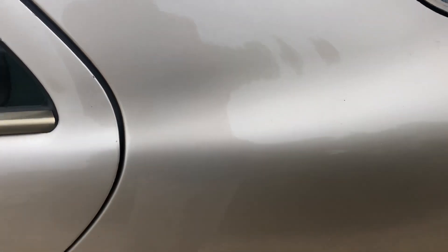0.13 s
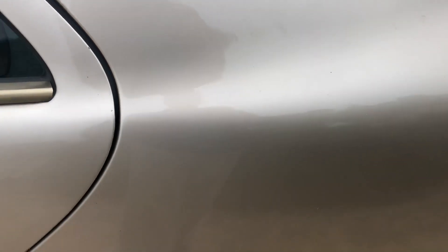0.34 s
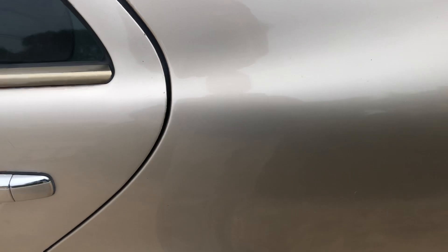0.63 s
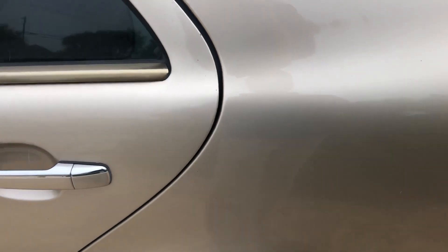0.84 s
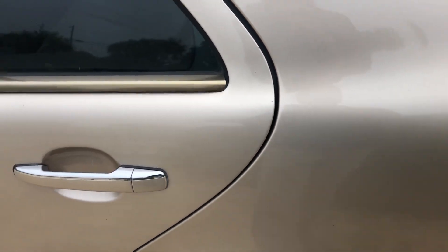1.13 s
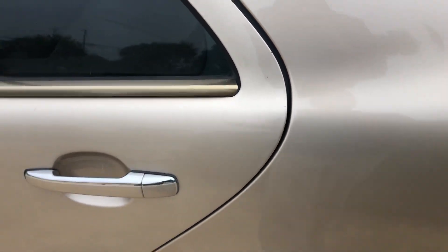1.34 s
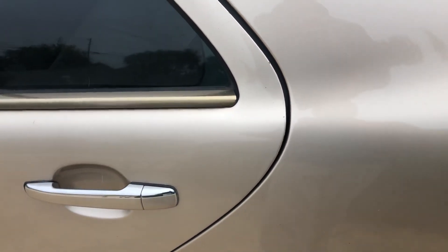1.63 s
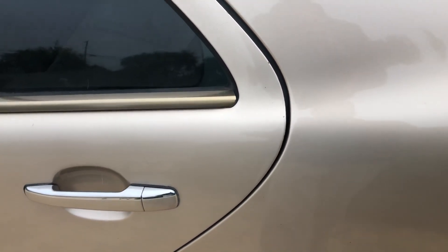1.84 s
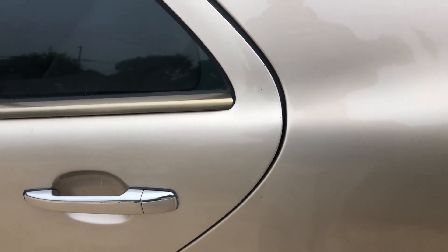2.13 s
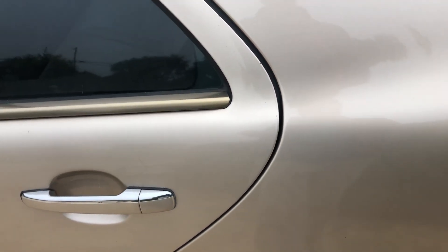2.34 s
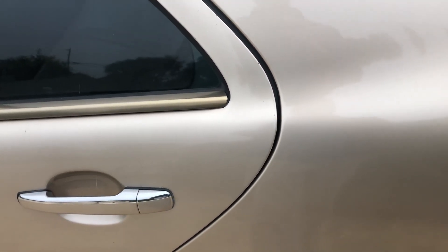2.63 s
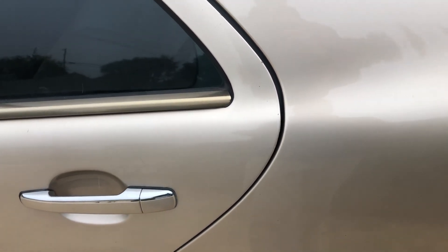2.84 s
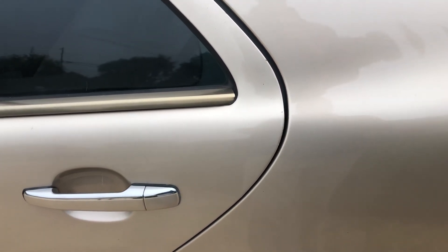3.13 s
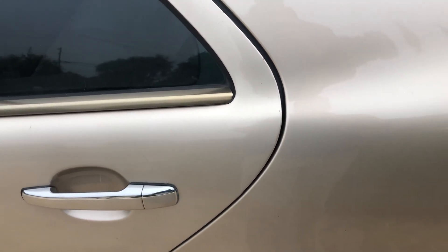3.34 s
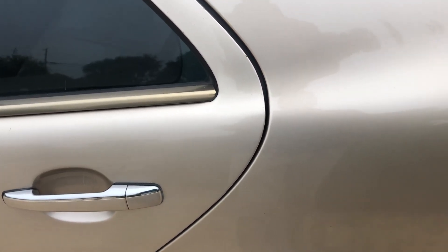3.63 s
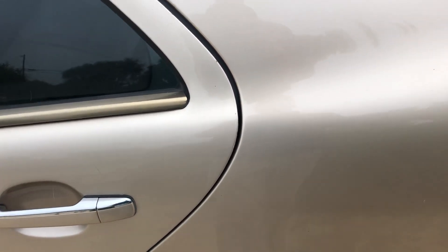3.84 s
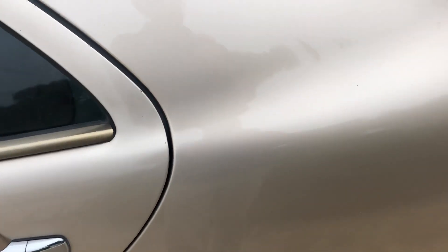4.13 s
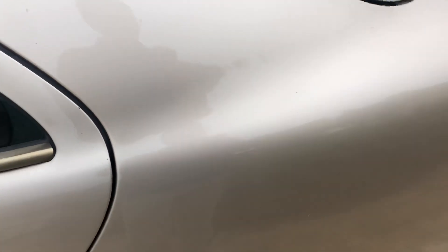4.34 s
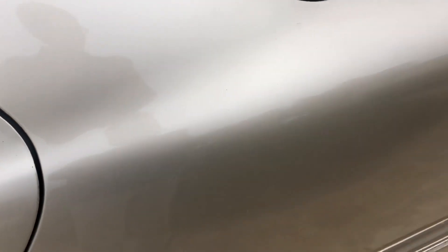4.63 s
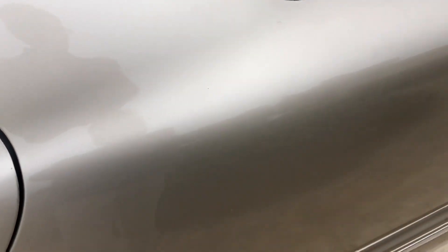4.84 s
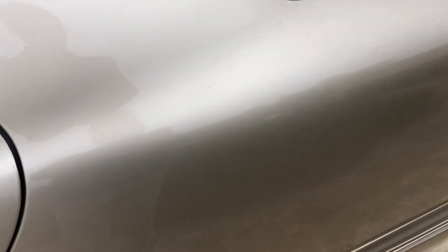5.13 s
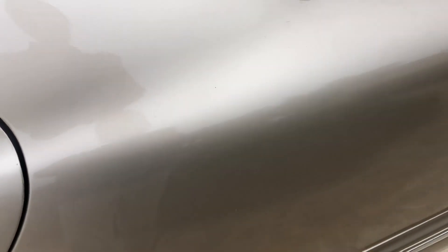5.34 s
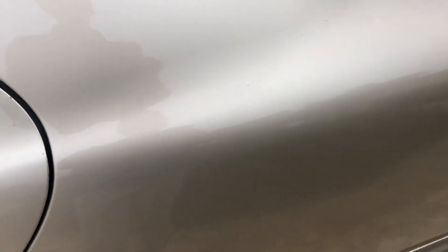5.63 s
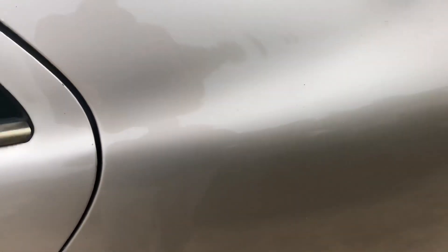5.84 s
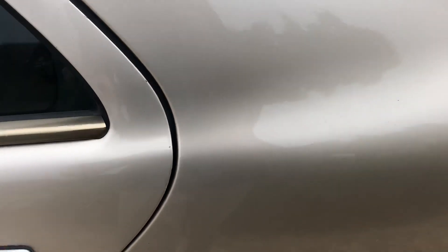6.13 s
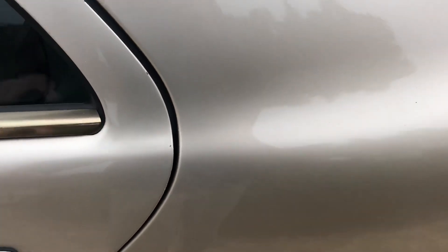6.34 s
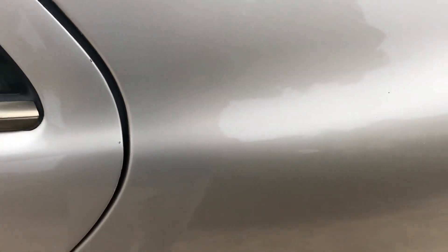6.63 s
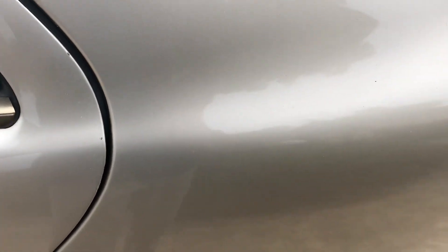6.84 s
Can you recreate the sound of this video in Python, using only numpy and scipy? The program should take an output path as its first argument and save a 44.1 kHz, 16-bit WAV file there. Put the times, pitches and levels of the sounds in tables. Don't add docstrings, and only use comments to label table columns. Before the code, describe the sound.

Close dry plastic crinkling and sharp folding snaps over faint traffic hum, with scuffing shoes, one distant bird whistle and a late door thud.

```python
import sys
import numpy as np
from scipy import signal
from scipy.fft import rfft, irfft, next_fast_len
from scipy.io import wavfile
from scipy.ndimage import uniform_filter1d, map_coordinates

SR = 44100
rng = np.random.default_rng(int(sys.argv[2]) if len(sys.argv) > 2 else 0)


def pcm_store(signal):
    levels = np.round(np.clip(np.atleast_2d(signal), -1, 1) * 32767)
    wavfile.write(sys.argv[1], SR, levels.astype(np.int16).T)


def nominal_scale(level):
    x = np.asarray(level, float) / 20
    return 10 ** x


N = 308259

THIN_BODY_DB = -20.5
BURST_T60 = 0.003


def unit(x):
    return x / np.sqrt(np.mean(x ** 2) + 1e-20)


def peak_unit(rows):
    return rows / np.abs(rows).max(axis=1, keepdims=True)


def curves(rows):
    s, *columns = np.transpose(rows)
    return [np.interp(np.arange(N) / SR, s, column) for column in columns]


def wobble(rate):
    knots = rng.standard_normal(int(N * rate / SR) + 4)
    return map_coordinates(knots, [np.arange(N) * rate / SR])


def filtered(x, response):
    m = next_fast_len(x.shape[-1] + 4096)
    spectrum = rfft(x, m) * response(np.fft.rfftfreq(m, 1 / SR))
    return irfft(spectrum, m)[..., :x.shape[-1]]


def peak(f, hz, width_hz):
    return 1j * f * width_hz / (hz * hz - f * f + 1j * f * width_hz)


def above(f, hz):
    return (1j * f / (hz + 1j * f)) ** 3


def white():
    return rng.standard_normal(N)


def noise(spectrum):
    f, db = np.transpose(spectrum)
    return unit(filtered(white(), lambda hz: nominal_scale(np.interp(np.log(hz + 1), np.log(f), db))))


def whistle(hz):
    return np.sin(2 * np.pi * np.cumsum(hz) / SR)


def place(times, rows):
    start = np.round(np.asarray(times) * SR).astype(int)
    at = start[:, None] + np.arange(rows.shape[1])
    return np.bincount(at.ravel(), rows.ravel(), N + SR)[:N]


def strokes(table, rise, fall):
    s, hold, db = np.transpose(table)[:3, :, None]
    t = np.arange(N) / SR
    return nominal_scale(db - rise * np.maximum(s - t, 0) - fall * np.maximum(t - s - hold, 0))


def flips(rate, spread_db, t60):
    hits = rng.random(N) < rate / SR
    sizes = nominal_scale(spread_db * np.minimum(rng.exponential(size=N), 3)) * hits
    decay = nominal_scale(-60 * np.arange(900) / SR / t60)
    swell = signal.fftconvolve(sizes, decay)[:N] + 0.07
    return swell / np.sqrt(np.abs(uniform_filter1d(swell ** 2, size=SR // 20)))


def rings(table, rise_s, beat):
    s, hz, db, t60 = np.transpose(table)[:, :, None]
    t = np.arange(SR // 4) / SR
    twin = np.sin(2 * np.pi * hz * 1.012 * t)
    pair = np.sin(2 * np.pi * hz * t) + beat * twin
    return place(s[:, 0], nominal_scale(db - 60 * t / t60) * pair * (1 - np.exp(-t / rise_s)))


def still_air():
    # f/Hz, level/dB per Hz
    hush = [(180, -36), (300, -5.5), (730, -11.5), (1450, -17), (3000, -25), (6000, -27), (10000, -30),
            (16000, -30)]
    return nominal_scale(-69.0 + 0.12 * wobble(0.22)) * noise(hush)


def far_traffic():
    # f/Hz, level/dB per Hz
    hum = [(15, -65), (25, -50), (40, -12.5), (86, 1), (151, -6.5), (179, -9), (406, -23.5), (467, -27),
           (522, -32), (700, -29.5), (910, -35), (1540, -120)]
    # t/s, level/dB
    road = [
        (0, -56.5),
        (.5, -57),
        (4.55, -58.5),
        (4.75, -60),
        (5.6, -60.5),
        (5.9, -55),
        (6.3, -58.5),
        (6.99, -61),
    ]
    level_db, = curves(road)
    return nominal_scale(level_db + 2.5 + 0.89 * wobble(8.1)) * noise(hum)


def drone():
    # t/s, f/Hz, fundamental level/dB, octave level/dB
    engine = [
        (5.6, 236.7, -62, -74),
        (6.0, 221.5, -53, -75),
        (6.3, 204, -53.5, -94),
        (6.65, 187.8, -56, -67.5),
        (6.99, 178.7, -58, -75.5),
    ]
    hz, first_db, second_db = curves(engine)
    turn = 2 * np.pi * np.cumsum(hz * (1 + 0.0016 * wobble(32))) / SR
    fade = np.clip((np.arange(N) / SR - engine[0][0]) / 0.052, 0, 1)
    return fade * (nominal_scale(first_db + wobble(24.0)) * np.sin(turn) + nominal_scale(second_db) * np.sin(2 * turn))


def insects():
    # t/s, thin level/dB, wide level/dB
    hiss = [
        (0, -95, -100),
        (2.2, -90, -100),
        (2.4, -87.5, -100),
        (3.9, -89.5, -100),
        (4.7, -106, -100),
        (6.55, -100, -100),
        (6.75, -100, -76.5),
        (6.99, -100, -78),
    ]
    thin_db, wide_db = curves(hiss)
    thin = unit(filtered(white(), lambda f: peak(f, 9800, 700) ** 2))
    wide_bands = lambda f: peak(f, 7600, 500) - 0.72 * peak(f, 9000, 900) + 0.5 * peak(f, 10800, 900)
    wide = unit(filtered(white(), wide_bands))
    return nominal_scale(thin_db) * thin + nominal_scale(wide_db) * wide


def bird():
    # t/s, f/Hz, level/dB
    call = [
        (3.15, 2950, -95),
        (3.18, 2980, -79),
        (3.245, 3140, -79),
        (3.26, 3050, -80),
        (3.3, 2950, -79),
        (3.36, 2840, -75),
        (3.45, 2860, -78),
        (3.54, 2760, -80),
        (3.58, 2740, -92),
    ]
    hz, db = curves(call)
    return nominal_scale(db - 1.5 + 3 * wobble(70)) * whistle(hz * (1 + 0.009 * wobble(120)))


def shoes():
    # f/Hz, level/dB per Hz
    ground = [(240, -34), (400, 1), (700, 5.5), (1500, 4), (3000, 1.5), (5000, 0.5), (8000, -5),
              (16000, -4)]
    sole_hz = [700, 1400, 3200, 8000]
    # t/s, hold/s, level/dB
    steps = [
        (0, 0.011, -55.5),
        (.41, 0.11, -58.5),
        (.63, 0.027, -63),
        (1.05, 0.087, -55),
        (4.28, 0.14, -68.5),
    ]
    grit = 0
    for hz in sole_hz:
        grit = grit + nominal_scale(3.5 * wobble(18)) * filtered(noise(ground), lambda f: peak(f, hz, 0.7 * hz))
    scuff = strokes(steps, rise=79, fall=94).sum(axis=0) * nominal_scale(4) * unit(grit)
    return scuff * (0.72 + 0.28 * flips(rate=400, spread_db=4, t60=0.012))


def door_rattle():
    # f/Hz, width/Hz, level/dB
    skin = [(120, 38, 11), (264, 100, 0), (390, 690, -5), (503, 26, 1), (765, 230, -4.5), (1096, 63, -4),
            (1890, 1300, -8)]
    # t/s, level/dB, hardness/Hz, t60/s
    thuds = [
        (5.68, -47, 602, 0.97),
        (5.801, -41.5, 600, 0.26),
        (5.879, -40, 890, 0.28),
        (6.019, -22, 990, 0.12),
        (6.058, -34, 800, 0.19),
    ]
    s, db, hard_hz, t60 = np.transpose(thuds)[:, :, None]
    t = np.arange(SR // 3) / SR
    shake = rng.standard_normal((len(s), len(t))) * nominal_scale(-60 * t / t60) * (1 - np.exp(-t / 0.0038))

    def panel(f):
        modes = sum(nominal_scale(g) * peak(f, hz, w) for hz, w, g in skin)
        return above(f, 56) * modes / (1 + 1j * f / hard_hz) ** 2

    return place(s[:, 0], nominal_scale(db) * peak_unit(filtered(shake, panel)))


def door_slam():
    # t/s, f/Hz, level/dB, t60/s
    modes = [
        (6.0165, 1980, -38, 0.032),
        (6.018, 1072, -29, 0.036),
        (6.02, 503, -34, 0.08),
        (6.0208, 264, -14, 0.046),
        (6.0359, 264, -18, 0.028),
        (6.0433, 264, -27, 0.034),
        (6.043, 150, -24, 0.034),
    ]
    return rings(modes, rise_s=1 / np.transpose(modes)[1][:, None], beat=0)


def keys():
    # t/s, f/Hz, level/dB, t60/s
    touches = [(.025, 2700, -32, 0.03), (0.06, 9510, -45, 0.06), (0.061, 6330, -41, 0.02),
               (.086, 6330, -47, 0.03), (0.1, 2700, -44, 0.07), (.099, 9510, -42, 0.09),
               (.107, 12200, -43, 0.05), (0.133, 4740, -41, 0.02), (0.162, 12200, -57, 0.05),
               (.047, 7830, -24, 0.028), (0.361, 6060, -44, 0.04), (0.362, 15000, -45, 0.03),
               (.368, 12200, -46, .02)]
    return rings(touches, rise_s=0.0018, beat=0.26)


def crackle():
    # f/Hz, width/Hz, level/dB
    sheet = [(2620, 1440, 3), (4400, 1200, 2), (6000, 870, -3.5)]
    # t/s, hold/s, level/dB, treble over it/dB
    squeezes = [(0.025, 0.04, -44.5, 0), (0.861, 0.1, -52, 0), (1.103, 0.066, -53, 0.5),
                (1.287, 0.075, -46, 2), (1.516, 0.076, -53, -11), (1.871, 0.021, -42.5, -7.5),
                (1.935, 0.06, -61, -10), (2.11, 0.049, -47, 1), (2.169, 0.016, -40, -9),
                (2.18, 0.067, -53, -4.5), (2.854, 0.076, -69, -16), (3.667, 0.029, -49.5, -9),
                (3.913, 0.02, -48, -6), (4.37, 0.049, -70, -17), (4.548, 0.024, -64, 0),
                (5.053, 0.015, -59.5, -4), (5.626, 0.042, -52.5, -5), (5.939, 0.033, -49, -5),
                (6.015, 0.098, -54.5, -5), (6.131, 0.065, -58, -1), (6.511, 0.025, -59.5, -8.5)]
    # t/s, hold/s, level/dB, treble over it/dB
    slides = [(0.1, 0.049, -57, 4.5), (0.308, 0.23, -60, 0), (0.636, 0.13, -72, 3), (0.828, 0.033, -58, -3),
              (0.99, 0.094, -61.5, -20), (1.218, 0.065, -64, -1), (1.667, 0.13, -62.5, -19),
              (2.311, 0.064, -61, -11), (3.612, 0.011, -54, -9), (3.748, 0.11, -68.5, -17),
              (4.099, 0.051, -67.5, -4), (5.221, 0.072, -64, -3), (6.218, 0.078, -61.5, -3)]
    rest_db, rest_treble_db = -78, -88
    grip = np.vstack([strokes(squeezes, rise=2600, fall=1500), strokes(slides, rise=490, fall=720)])
    bright = nominal_scale([row[-1] for table in (squeezes, slides) for row in table])
    common = flips(rate=260, spread_db=3.5, t60=0.009)
    body = 0
    for hz, width_hz, db in sheet:
        own = flips(rate=260, spread_db=3.5, t60=0.014)
        sputter = (common + own) * white()
        body = body + nominal_scale(db) * filtered(sputter, lambda f: peak(f, hz, width_hz) ** 2)
    treble = filtered((common + 0.82) * white(), lambda f: above(f, 4000) * peak(f, 8500, 15000))
    body_gain = grip.sum(axis=0) + nominal_scale(rest_db)
    treble_gain = bright @ grip + nominal_scale(rest_treble_db)
    return body_gain * unit(body) + treble_gain * unit(treble)


def snaps(rows):
    s, db, hz, treble_db, low_db, t60 = np.transpose(rows)[:, :, None]
    t = np.arange(2048) / SR
    sputter = np.minimum(t60 / 0.0073, 0.3) ** 0.5 * 0.5
    burst = sputter * rng.standard_normal((len(s), len(t))) * nominal_scale(-60 * t / np.clip(t60, 0.001, 0.05))
    burst[:, 0] = np.sign(burst[:, 0])
    broad = 0.06 + 0.4 * (BURST_T60 / t60) ** 1.5
    fold = lambda f: (peak(f, hz, 0.12 * hz) + broad) * peak(f, np.maximum(hz, 3326), 7600) ** 2
    ring = peak_unit(filtered(burst, fold))
    shorter = burst * nominal_scale(-60 * t / t60 / 1.6)
    treble = peak_unit(filtered(shorter, lambda f: peak(f, 11300, 17000) ** 2))
    low = peak_unit(filtered(burst, lambda f: peak(f, 1430, 2820) ** 2))
    snap = nominal_scale(1.0) * ring - nominal_scale(treble_db - 13.0) * treble - nominal_scale(low_db - 5.0) * low
    return place(s[:, 0], nominal_scale(db) * snap)


def chatter():
    # t/s, peak level/dB, ring f/Hz, treble/dB
    early = [(0.0276, -44, 2860, 11), (0.0498, -28.5, 2730, 20.5), (0.112, -51, 2780, 35),
             (0.6768, -48, 2860, 19), (0.7569, -51, 4600, 17), (0.8321, -41, 2300, 1),
             (0.8585, -36, 3900, 2), (0.8712, -52, 4370, -14), (0.8956, -36, 3170, 7),
             (0.899, -39, 2800, 15), (0.903, -39, 3060, 0), (0.938, -40, 2350, 8), (0.957, -38.5, 5200, 17),
             (1.1362, -37.5, 4200, 20), (1.1696, -53, 4480, 34), (1.2038, -43, 2290, 4),
             (1.228, -50, 3770, 32), (1.2598, -44, 4100, 18), (1.271, -43, 2420, 17),
             (1.3044, -42, 5040, 29), (1.3158, -54, 3570, 38), (1.323, -41, 3620, 24),
             (1.3368, -33, 2360, 23), (1.3611, -37.5, 4300, 29.5), (1.3946, -41, 2250, -5),
             (1.4224, -50, 2540, 10), (1.5245, -35.5, 2610, 14), (1.5473, -40, 2330, -4),
             (1.561, -42, 2730, 20), (1.5756, -27.5, 2960, -1), (1.578, -50, 3250, 2),
             (1.6049, -51, 2390, -2), (1.724, -51, 2710, -7), (1.7612, -42, 3740, -17),
             (1.7693, -48, 3960, -4), (1.8954, -41, 4100, -3), (1.9346, -58, 2690, 8),
             (1.974, -48, 2710, 14), (2.0315, -53, 5340, 4), (2.1488, -28.5, 2680, -8),
             (2.1696, -30, 2730, -6), (2.1995, -41, 2390, 21), (2.2064, -47, 2910, 8),
             (2.358, -62, 4260, 32), (2.3977, -49.5, 4100, -6.5), (2.581, -57.5, 2880, 9),
             (2.9342, -51.5, 2970, -21), (2.992, -61, 2890, 12), (3.0419, -56, 2890, -16)]
    # t/s, peak level/dB, ring f/Hz, treble/dB
    late = [(3.1002, -42.5, 5030, 5), (3.1414, -57, 3660, 21), (3.4736, -40.5, 4200, 5),
            (3.5426, -50, 2690, -5), (3.5624, -42, 3930, 21), (3.5796, -48, 2560, 18),
            (3.6465, -40, 4300, -7), (3.651, -45, 2520, -14), (3.653, -56, 4590, -16),
            (3.6667, -57, 2800, 30), (3.6923, -45, 3750, -19), (3.717, -49.5, 2420, -14),
            (3.864, -53.5, 2330, -6), (4.0058, -56, 2200, 22), (4.0316, -61, 5560, 24),
            (4.095, -47.5, 5600, 2), (4.3355, -62, 4030, 31), (4.4812, -58, 2100, 18),
            (4.496, -51, 4930, 18), (4.546, -54, 5860, -7), (4.619, -56, 5260, 1), (4.873, -52, 2760, -11),
            (5.093, -56, 2320, -17), (5.1746, -52.5, 2590, 20), (5.2146, -52, 2820, -16),
            (5.5305, -63, 3400, 27), (5.599, -57, 6180, 14), (5.6525, -38, 6160, -5),
            (5.6727, -44, 2840, -8), (5.691, -48, 2580, 5), (5.7693, -54, 2560, -12),
            (5.7776, -50, 2280, 7), (5.8996, -38.5, 2800, -17), (5.9412, -33.5, 3200, 2),
            (5.9539, -34, 2780, 23), (5.957, -50, 7000, 25), (6.074, -40, 2540, 16),
            (6.0796, -52, 2630, 26), (6.143, -38, 2780, -6), (6.1668, -35, 3280, -16),
            (6.1716, -36.5, 4500, -13), (6.1806, -40.5, 2540, 9), (6.194, -40, 2370, 13),
            (6.231, -43, 2700, -1.5), (6.864, -58, 2840, -11)]
    # t/s, peak level/dB, ring f/Hz, treble/dB
    further = [(0.885, -39, 3000, 0), (1.0153, -48, 4000, 22), (1.2538, -49, 4100, 18),
               (1.308, -39, 3000, 28), (1.349, -41, 4300, 12), (1.672, -48, 3950, -2), (1.711, -52, 3930, 1),
               (1.79, -44, 4100, 0), (2.217, -39, 2720, 5), (2.2361, -40.5, 2620, 8),
               (2.317, -47.5, 2900, 1), (2.329, -44.5, 4200, 4), (3.167, -58.5, 3640, 5),
               (3.256, -61, 3900, -5), (3.618, -41, 4000, 5), (3.675, -49, 4200, 32), (3.682, -39, 4300, 0),
               (3.9326, -46, 3870, 22), (3.945, -54, 3940, 22), (6.055, -49, 5500, 22),
               (.231, -57, 6300, 26), (1.86, -45, 2600, 8), (2.847, -45.5, 2760, 12), (3.778, -67, 4000, 28)]
    t60 = 0.018
    rows = [(*row, THIN_BODY_DB, t60) for table in (early, late, further) for row in table]
    return nominal_scale(0.5) * snaps(rows)


def folds():
    # t/s, peak level/dB, ring f/Hz, treble/dB
    cracks = [(1.6823, -43, 7800, 8), (1.8672, -24.5, 2620, -5), (2.1282, -13, 3890, -66),
              (3.9168, -33.5, 5800, 6), (3.961, -48.5, 2320, 25), (4.0105, -49, 2700, 20),
              (4.1214, -39.5, 2400, 21.5), (4.3037, -44.5, 2900, -5), (4.5501, -58, 2500, 39.5),
              (4.5626, -33.5, 2080, -26), (4.759, -44, 2600, -17), (4.7768, -47, 2680, 28),
              (4.8829, -39, 6200, 14), (5.16, -45, 2400, 13), (5.295, -18.5, 5600, 4),
              (5.3587, -43.5, 4230, 13.5), (5.535, -52, 1700, 24.5), (6.1715, -54, 4460, -17),
              (6.239, -35, 2150, -21), (6.3901, -44.5, 5200, 13), (6.8375, -42.5, 3730, 9)]
    # t/s, peak level/dB, ring f/Hz, treble/dB
    ticks = [(.2594, -46.5, 6400, 19), (.286, -28, 4470, 14.5), (.737, -48, 5430, 21),
             (.915, -34, 3240, -11), (1.1391, -32.5, 3940, 24), (1.3388, -27, 3580, 15),
             (1.5022, -40, 2370, 0), (1.5195, -26, 2720, 12), (1.703, -44, 2880, -14),
             (1.776, -39.5, 3860, -19), (1.881, -18.5, 2410, -26), (2.0257, -46.5, 2730, 1),
             (2.097, -43, 3620, 25), (2.1913, -32.5, 2500, -2), (2.3517, -51, 4100, 29),
             (2.5044, -47.5, 2400, -20), (3.035, -53, 2700, 17), (3.5249, -30.5, 2170, 8),
             (3.6117, -48, 2980, 30), (3.8022, -42, 5800, -10), (4.3162, -53, 4930, 31),
             (4.4895, -40.5, 4900, 19), (4.5312, -39, 5030, -18), (4.7841, -43, 6400, -4),
             (4.7894, -46, 7000, 16), (4.905, -45.5, 2800, -13), (5.178, -55, 2820, 24),
             (5.2788, -38, 3060, -6), (5.733, -45, 2920, -20), (5.7856, -39, 2720, 17.5),
             (5.8677, -47.5, 3130, -25), (6.0872, -38, 2360, -14), (6.1031, -39.5, 5370, 20.5)]
    # t/s, peak level/dB, ring f/Hz, treble/dB
    sputters = [(.3093, -36, 2420, 11), (.8695, -26.5, 4450, -26), (.96, -40.5, 3130, 24),
                (1.164, -37, 3800, -19), (1.2188, -33, 4420, 21), (1.297, -33.5, 4360, 19.5),
                (1.5725, -24.5, 3900, 10.5), (1.7465, -37.5, 4000, -20), (1.9814, -42.5, 3540, -14),
                (2.1185, -29.5, 2770, 13.5), (2.1472, -36, 2770, -9), (2.9974, -47.5, 2550, -28),
                (3.1306, -51, 2600, 15), (3.4704, -40, 2700, 8), (3.5645, -40.5, 2700, 12),
                (3.788, -44.5, 4180, 14.5), (5.6616, -38.5, 6000, 24), (5.915, -28.5, 2750, 5),
                (5.9423, -51, 3060, -17), (5.9606, -32, 6500, 18), (6.1289, -36.5, 2500, 17),
                (6.158, -32, 2820, 5.5)]
    # t/s, peak level/dB, ring f/Hz, treble/dB, body/dB
    pops = [(1.4246, -38.5, 2300, -24, 3), (1.616, -45, 2650, -22, -11), (1.8134, -48.5, 2295, -21, 3.5),
            (2.7628, -56, 1500, -18, 19.5), (2.8586, -34.5, 4000, 17.5, 3), (2.896, -48.5, 2560, -20, 2),
            (3.2747, -54.5, 1700, -17, 11.5), (4.0887, -47, 2370, 16, 3), (4.3512, -41, 2840, -13, -1),
            (4.364, -29, 1910, 18.5, -8), (4.374, -39.5, 3000, 21, -5), (5.4456, -38.5, 3530, 4, -8),
            (5.673, -40, 2920, -15, 3), (5.6982, -38, 3380, 12, -3), (5.899, -41, 2720, -1, -3),
            (5.9869, -51.5, 4500, 5, 16), (6.2178, -52, 3100, -8, 11), (6.261, -42, 5470, 22, 6.5)]
    # t/s, peak level/dB, ring f/Hz, treble/dB, body/dB
    crunches = [(.0499, -33, 4030, 2, 3.5), (.3658, -37.5, 5940, 15, 0.5), (.938, -39, 2960, -18, -3),
                (1.361, -37.5, 3850, 10, 0.5), (1.4003, -36.5, 3130, -24, -3.5),
                (1.555, -38.5, 2550, 8, 2.5), (2.167, -29.5, 3300, 17, -40), (5.036, -45, 2360, -23, -2),
                (5.6373, -33.5, 4260, -2, -4), (6.0208, -28, 1970, 4, -25), (6.5126, -49, 5550, 18.5, 8)]
    # t/s, peak level/dB, ring f/Hz, treble/dB, body/dB
    bursts = [
        (3.0962, -23, 2220, 9, -6),
        (3.3212, -32, 5270, 11, 1),
        (5.0496, -25.5, 5300, 17, 0.5),
        (3.6407, -26, 2470, 2, -28),
        (4.8225, -16.5, 5100, 14.5, -8.5),
        (5.2238, -20, 4930, 26.5, 2),
        (5.629, -29, 5470, 8, -8),
    ]
    thin_kinds = [(cracks, 0.004), (ticks, 0.011), (sputters, 0.031)]
    thick_kinds = [(pops, 0.014), (crunches, 0.048), (bursts, BURST_T60)]
    thin = [(*row, THIN_BODY_DB, t60) for kind, t60 in thin_kinds for row in kind]
    thick = [(*row, t60) for kind, t60 in thick_kinds for row in kind]
    return snaps(sorted(thin + thick))


def yard(x):
    # delay t/s, level/dB
    panel = [
        (.0025, -22),
        (.0066, -35),
    ]
    t = np.arange(SR // 8) / SR
    answer = nominal_scale(-57 - 60 * t / 0.09) * rng.standard_normal(len(t))
    answer[0] = 1
    for s, db in panel:
        smear = nominal_scale(db - 7 - np.arange(60) / 3) * rng.standard_normal(60)
        answer[round(s * SR):][:60] += smear
    return signal.fftconvolve(x, answer)[:N]


def scene():
    background = still_air() + far_traffic() + drone() + insects() + bird()
    door = door_rattle() + door_slam()
    wrapper = nominal_scale(-1.5) * crackle() + chatter() + folds()
    return (background + shoes() + yard(door + keys() + wrapper))[None]


def top_cut(x):
    return signal.sosfilt(signal.butter(12, 17100, fs=SR, output="sos"), x)


def record(dry):
    edge = lambda f: above(f, 22) * (0.04 * (f < 16900) + 0.96 / (1 + (f / 15850) ** 240))
    return top_cut(filtered(dry, edge))


dry = scene()
out = record(dry)
pcm_store(out)
```